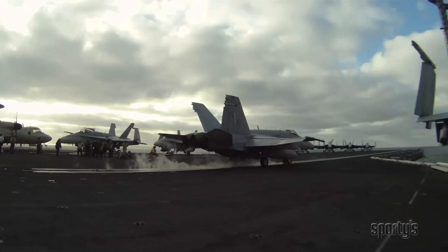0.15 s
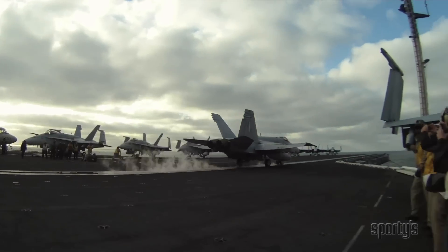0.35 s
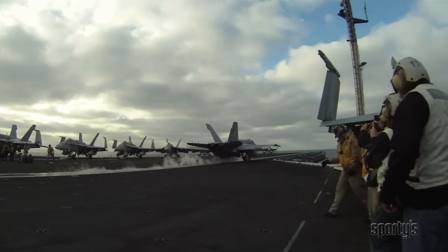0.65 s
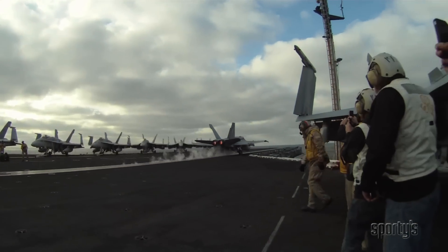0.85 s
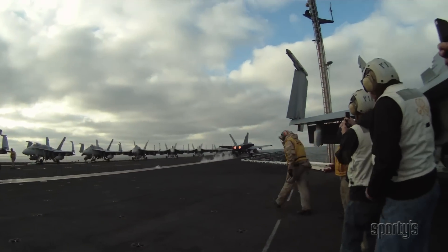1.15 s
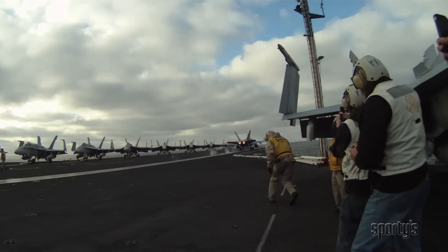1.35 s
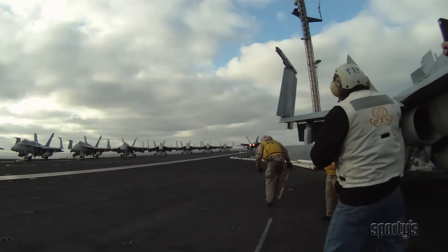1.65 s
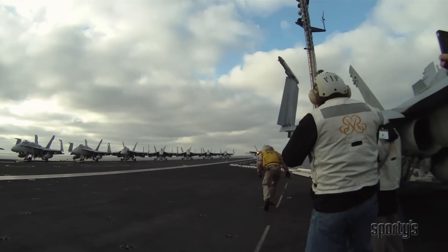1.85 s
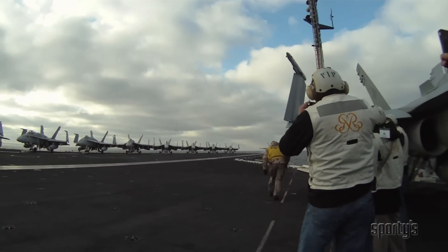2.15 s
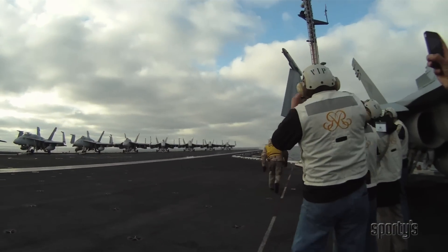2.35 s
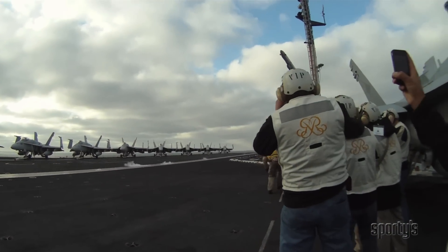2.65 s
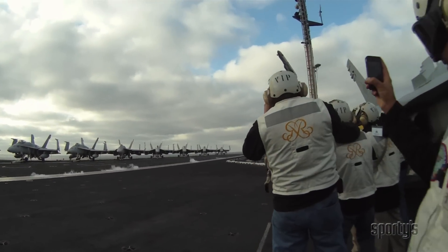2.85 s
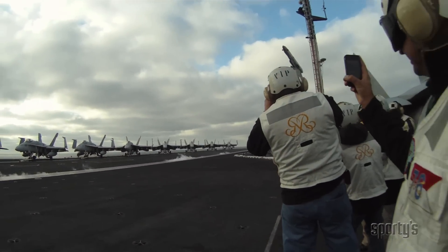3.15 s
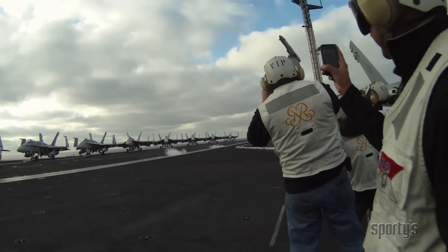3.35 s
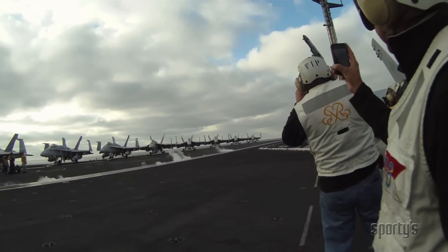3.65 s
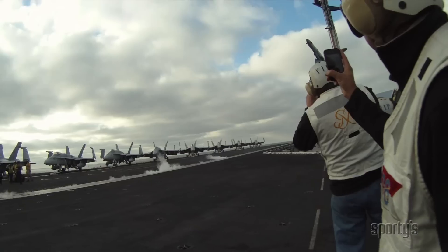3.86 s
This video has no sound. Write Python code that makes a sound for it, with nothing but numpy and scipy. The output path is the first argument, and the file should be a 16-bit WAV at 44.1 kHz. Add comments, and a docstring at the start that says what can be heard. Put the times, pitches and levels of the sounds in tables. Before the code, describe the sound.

A fighter jet roars off a ship's deck, overloading the microphone, then quickly fades away

```python
"""On a carrier deck a fighter is catapulted off on afterburner and recedes; its roar swells once more from afar.
The exhaust is shaped noise: a tearing hiss with crackle, a roar and a rumble, each fluttering with turbulence.
The roar and rumble bounce off the deck, distance takes the treble, and a low drone lies underneath.
All the jet sound rings in a camera housing; the blast overloads the microphone during the first second."""
import sys
import numpy as np
from scipy import signal
from scipy.fft import rfft, irfft
from scipy.io import wavfile

SR = 44100
rng = np.random.default_rng(int(sys.argv[2]) if len(sys.argv) > 2 else 0)


def store_pcm(level_fs):
    """Save levels as 16-bit WAV."""
    pcm = np.round(np.clip(level_fs, -1, 1) * 32767).astype(np.int16)
    wavfile.write(sys.argv[1], SR, np.atleast_2d(pcm).T)


N = 176400
TIME = np.arange(N) / SR  # s
HZ = np.fft.rfftfreq(N, 1 / SR)


def jet():
    """The exhaust parts and the far swell add up, all shaken by the same gusts."""
    shared_flutter_db = 0.42  # rms
    exhaust = hiss() + off_deck(roar() + rumble()) + swell()
    return exhaust * amp(shared_flutter_db * flutter())


# Hiss loudness before its trim: (time [s], level [dB])
HISS_CURVE = [(0, -6.5), (0.25, -2), (0.55, -3.5), (0.85, -7.5), (0.95, -12), (1.18, -14.5), (1.4, -18),
              (1.7, -21.5), (1.9, -22.5), (2.05, -21.5), (2.3, -26.5), (2.52, -29.5), (2.62, -34.5),
              (2.78, -40.2), (3, -41), (3.2, -43), (3.42, -44), (3.48, -41), (3.62, -41.5), (3.85, -36.5),
              (4, -40)]
# Hiss colour, relative: (frequency [Hz], density [dB per Hz])
HISS_SPECTRUM = [(700, -27), (1400, -7.5), (2000, -1.5), (3200, 2.5), (4900, -0.5), (5900, -9.5),
                 (7500, -14), (9500, -20.5), (12000, -29), (15000, -44.5)]


def hiss():
    """Fine turbulence at the nozzles tears the air, with shock crackle mixed into it."""
    trim_db, flutter_db = 0.5, 0.44
    crackle_db = -10  # against the fine noise, before colouring
    drive = rng.standard_normal(N) + amp(crackle_db) * crackle()
    return amp(trim_db) * turbulence(drive, HISS_SPECTRUM, HISS_CURVE, flutter_db)


def crackle():
    """Small shock fronts of uneven strength arrive at random as single-sample clicks."""
    shocks_per_s, spread_db = 1600, -0.5
    size = amp(spread_db * np.minimum(rng.exponential(1, N), 4))
    arrives = rng.random(N) < shocks_per_s / SR
    return unit(size * arrives)


# Roar loudness before its trim: (time [s], level [dB])
ROAR_CURVE = [(0, -15), (.15, -13.5), (.35, -5.5), (.52, -6.5), (.66, -11), (.85, -13.5), (1.24, -20.5),
              (1.5, -25.5), (1.8, -29.5), (2.02, -29.5), (2.35, -29), (2.54, -33.5), (2.63, -38),
              (2.9, -45.5), (3.38, -50), (3.6, -45), (4, -45.5)]
# Roar colour, relative: (frequency [Hz], density [dB per Hz])
ROAR_SPECTRUM = [(150, -60), (450, -8), (650, -3), (900, 2.5), (1350, 2), (1700, -10), (2500, -6),
                 (12000, -97)]
ROAR_FLUTTER_DB = 0.48  # rms, shared with the far swell


def roar():
    """Larger eddies in the plume radiate the middle of the sound."""
    trim_db = 4.2
    return amp(trim_db) * turbulence(rng.standard_normal(N), ROAR_SPECTRUM, ROAR_CURVE, ROAR_FLUTTER_DB)


# Rumble loudness before its trim, strongest as the tail turns to the microphone: (time [s], level [dB])
RUMBLE_CURVE = [(0, -38), (0.299, -34), (.55, -24), (.7, -23.5), (.9, -28), (1.12, -29), (1.4, -36),
                (1.65, -39.5), (1.78, -42.5), (2, -49.5), (2.38, -48), (2.65, -51), (2.95, -55.5),
                (3.3, -57), (3.6, -59), (4, -62)]
# Rumble colour, relative: (frequency [Hz], density [dB per Hz])
RUMBLE_SPECTRUM = [(20, -25), (60, -22), (130, -1), (210, 2.5), (290, -1), (400, -4.5), (650, -3.5),
                   (1000, -14.5), (2000, -40), (9000, -93)]


def rumble():
    """The low end of the exhaust noise, with the deepest flutter."""
    trim_db, flutter_db = 11, 1.15
    return amp(trim_db) * turbulence(rng.standard_normal(N), RUMBLE_SPECTRUM, RUMBLE_CURVE, flutter_db)


# Far swell as the jet climbs off the bow: (time [s], level [dB])
SWELL_CURVE = [(3.4, -64.5), (3.62, -48), (3.69, -36.5), (3.84, -34.5), (4, -44.5)]
# Far swell colour, relative: (frequency [Hz], density [dB per Hz])
SWELL_SPECTRUM = [(200, -38), (420, -13.5), (560, -0.5), (740, -6.5), (1050, 6), (1300, -1), (1570, -1),
                  (1950, -20), (2600, -8), (9000, -70.5)]


def swell():
    """A late return of roar with its own colour, from the climbing jet."""
    return turbulence(rng.standard_normal(N), SWELL_SPECTRUM, SWELL_CURVE, ROAR_FLUTTER_DB)


def turbulence(drive, spectrum, curve, flutter_db):
    """One part of the exhaust noise, fluttering about its level curve."""
    fluttering = drive * amp(flutter_db * flutter())
    level_db = np.interp(TIME, *np.transpose(curve))
    return through_housing(fluttering, spectrum) * amp(level_db)


def flutter():
    """Random wavering of rms 1 over the range of eddy rates."""
    slow_hz, fast_hz = 4.1, 130.3
    slow_ratio = (HZ / slow_hz) ** 2
    above_slow = slow_ratio / (1 + slow_ratio)
    below_fast = 1 / (1 + (HZ / fast_hz) ** 2)
    weight = above_slow * below_fast / np.sqrt(HZ + 1)
    return unit(irfft(rfft(rng.standard_normal(N)) * weight, N))


# Resonances and notches of the camera housing: (centre [Hz], width [Hz], gain [dB])
HOUSING_MODES = [(614, 72, 1), (1271, 184, 7), (1470, 72, -1), (1803, 170, -7), (1920, 180, 3.5),
                 (2286, 45, -6.5), (3880, 410, 3), (4270, 730, 9.5), (5140, 110, 0), (5460, 131, 0)]


def through_housing(x, spectrum):
    """Gives x its spectrum and the ring of the housing, at rms 1."""
    ring_db = sum(gain / (1 + (2 * (HZ - centre) / width) ** 2) for centre, width, gain in HOUSING_MODES)
    return unit(coloured(x, read(spectrum) + ring_db))


def off_deck(x):
    """A bounce off the deck hollows the sound; its lag and strength shrink as the jet leaves."""
    start_lag_s, start_gain, fade_s = 0.00096, 0.45, 0.57
    near = np.exp(-TIME / fade_s)
    lag = start_lag_s * (1 + near) / 2  # shrinks towards half
    bounce = np.interp(TIME - lag, TIME, x)
    return x + start_gain * near * bounce


def through_air(x):
    """The growing distance takes away treble."""
    edge_hz, loss_db_per_s = 7050, 5
    low_pass = signal.butter(2, edge_hz, fs=SR, output="sos")
    dull = signal.sosfiltfilt(low_pass, x)
    treble = x - dull
    return dull + treble * amp(-loss_db_per_s * TIME)


# Drone colour, relative: (frequency [Hz], density [dB per Hz])
DRONE_SPECTRUM = [(20, -21.5), (70, -18.5), (110, -11), (170, -3.5), (212, 2), (260, -10), (340, -16),
                  (1000, -38), (6000, -91)]


def drone():
    """A steady narrow band of low noise, likely the ship's machinery, that shows once the jet is far."""
    level_db = -49.5
    return amp(level_db) * unit(coloured(rng.standard_normal(N), read(DRONE_SPECTRUM)))


def amp(db):
    """Decibels to gain."""
    return 10 ** (np.asarray(db) / 20)


def unit(x):
    """Scales to rms 1."""
    return x / np.sqrt(np.mean(x ** 2) + 1e-20)


def read(spectrum):
    """The dB of a spectrum at every frequency, interpolated over log frequency."""
    hz, db = np.transpose(spectrum)
    return np.interp(np.log(HZ + 1), np.log(hz), db)


def coloured(x, colour_db):
    """Causal minimum-phase filter with the given gain at every frequency."""
    cepstrum = irfft(np.log(amp(colour_db)), N)
    causal = cepstrum * (1 + np.sign(np.fft.fftfreq(N)))  # folded onto positive time
    impulse = irfft(np.exp(rfft(causal)), N)[:SR // 10]
    return signal.fftconvolve(x, impulse)[:N]


def scene():
    """The jet over the drone of the deck, in mono."""
    return (through_air(jet()) + drone())[None]


# Recorder tone after the overload, bass cut and treble lift: (frequency [Hz], gain [dB])
RECORDER_TONE = [(30, -10), (140, -14), (450, -4), (1000, -3), (4500, 0.5), (6000, 0), (9000, -1),
                 (15000, 0.5)]


def record(dry):
    """The microphone clips with a narrow knee; then come the recorder's tone and band limit."""
    clip_level, knee = 0.44, 17  # full swing; hardness of the limit
    band_edge_hz = 15280
    swing = signal.resample_poly(dry[0], 2, 1) / clip_level  # clipped at twice the rate against aliasing
    limited = clip_level * swing / (1 + abs(swing) ** knee) ** (1 / knee)
    clipped = signal.resample_poly(limited, 1, 2)
    toned = coloured(clipped, read(RECORDER_TONE))
    band_limit = signal.firwin(1023, band_edge_hz, window=("kaiser", 9), fs=SR)
    return signal.oaconvolve(toned, band_limit, "same")[None]


dry = scene()
out = record(dry)
store_pcm(out)
```